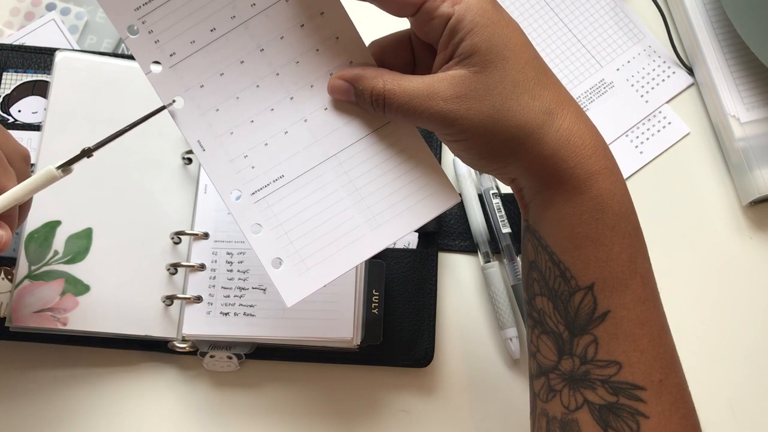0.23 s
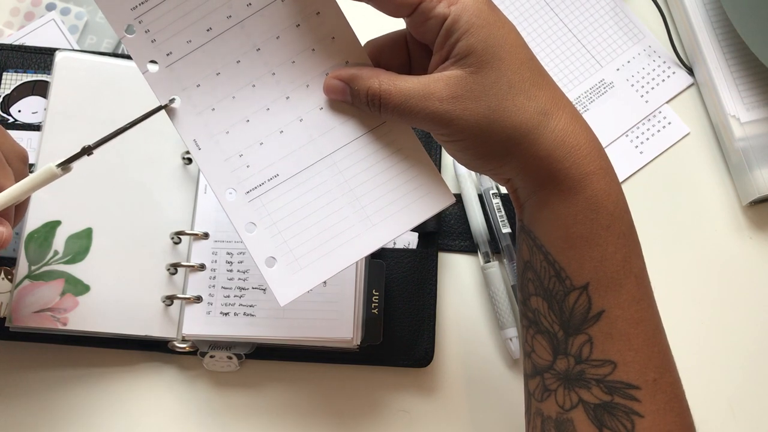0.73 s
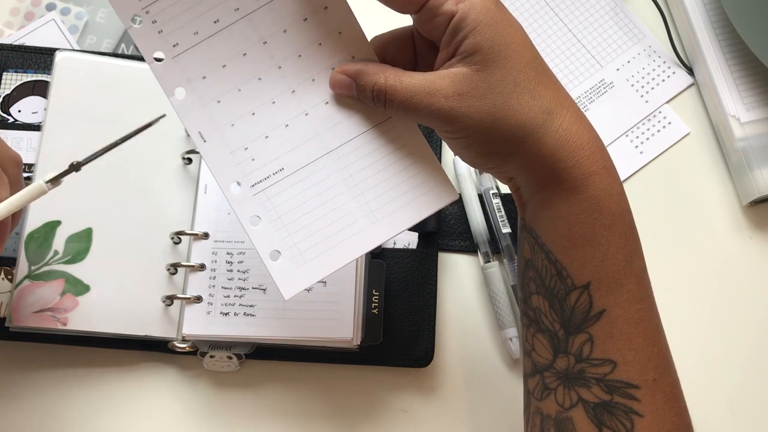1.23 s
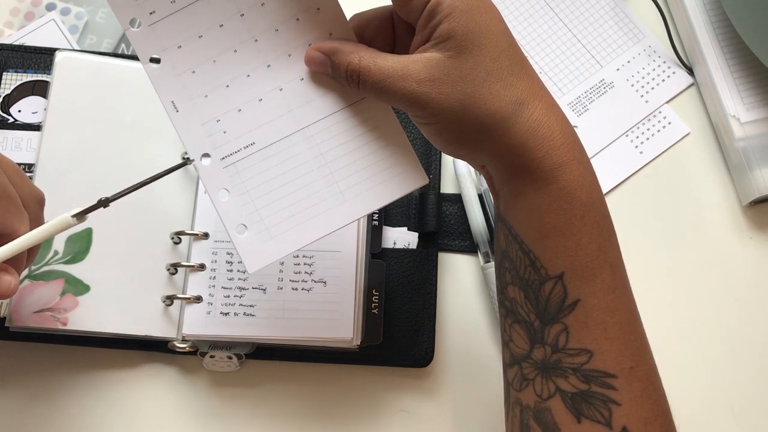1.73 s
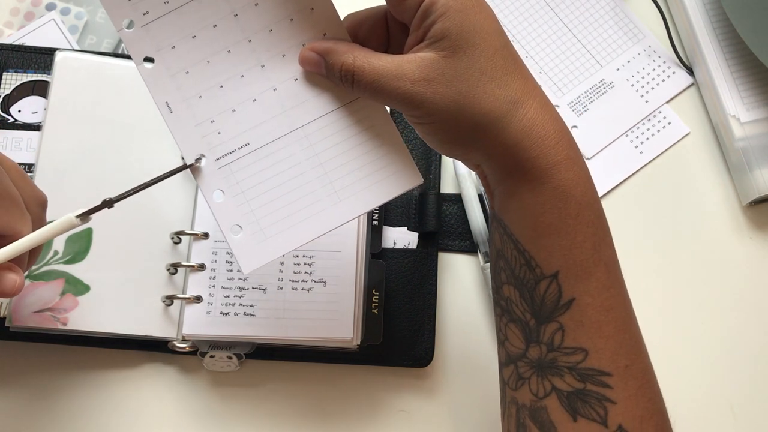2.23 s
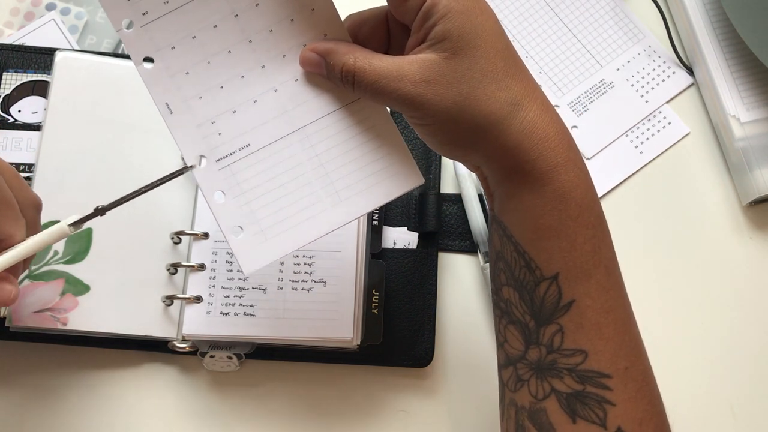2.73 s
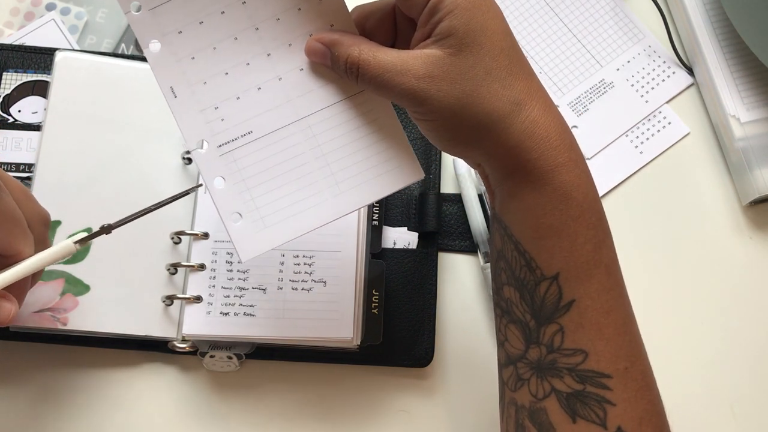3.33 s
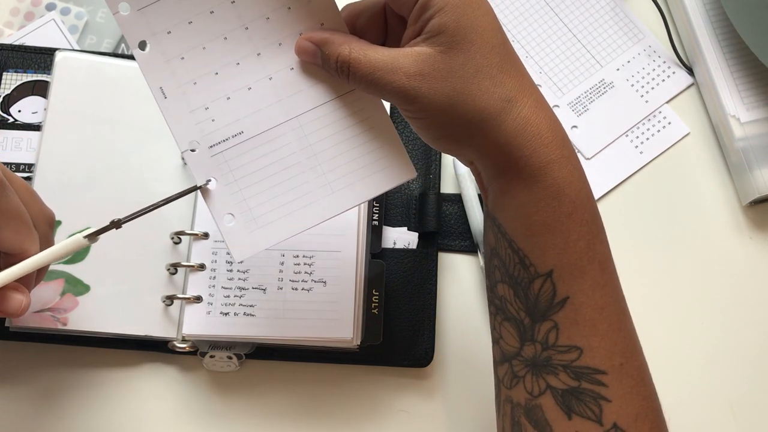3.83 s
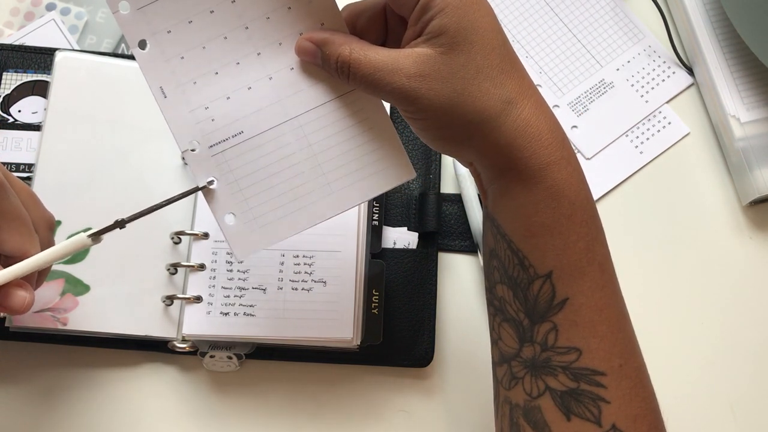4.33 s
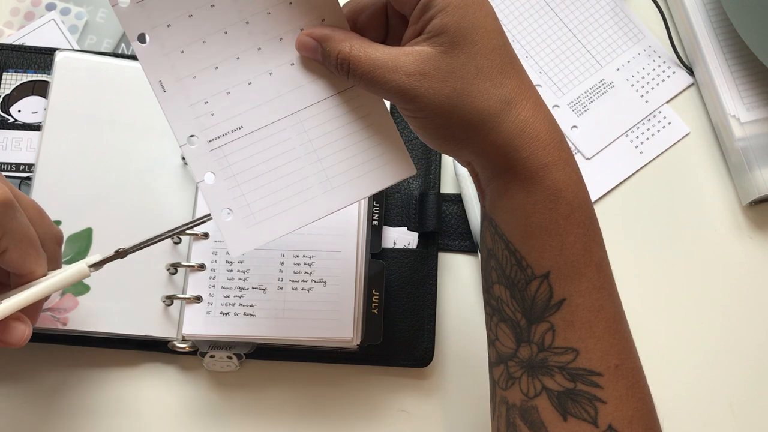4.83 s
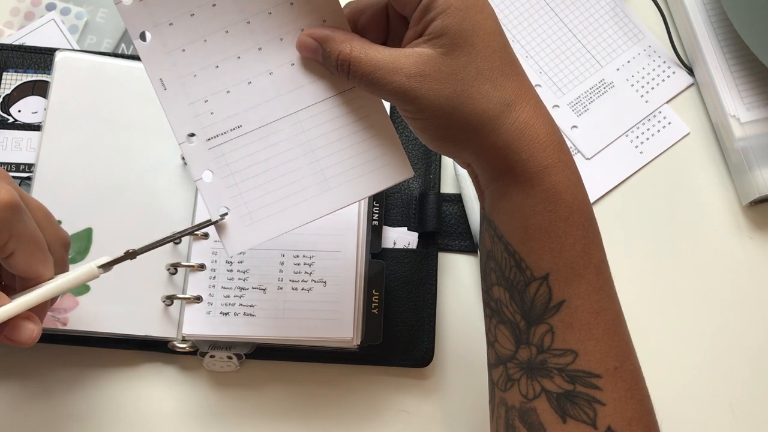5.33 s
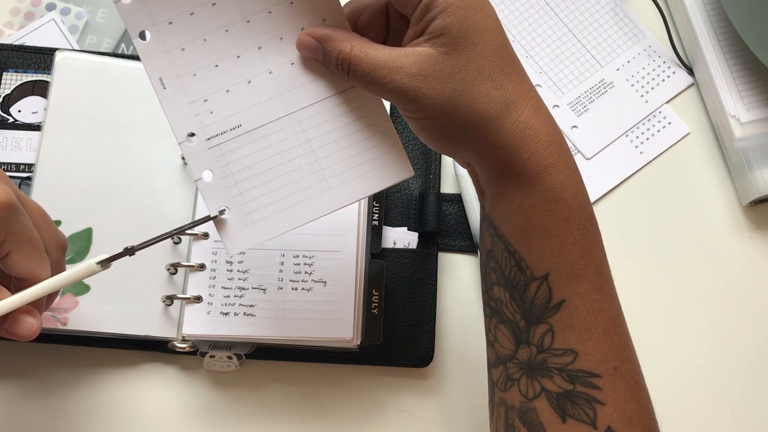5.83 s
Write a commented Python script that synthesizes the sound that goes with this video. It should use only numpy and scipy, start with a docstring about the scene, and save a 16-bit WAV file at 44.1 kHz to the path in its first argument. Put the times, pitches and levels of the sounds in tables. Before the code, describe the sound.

A close, quiet indoor scene with faint low hum, soft rumble and slight hiss. At 0.5 s a scissor tip barely brushes paper. At 1.04 s comes the first snip: a tiny bite, snapping fibres with a strong papery ring, and a hard bright steel clack with a short room tail. The blades scrape open from about 1.15 s and flick off the sheet at 1.26 s, the strongest flick. Soft brushes follow around 1.9-2.3 s. The second snip lands at 2.67 s, opening with a quieter rasp until 2.86 s. Two dry ticks sound near 3.15 s, then light rubs and little skips from 3.35 to 4.3 s. The third, slightly brighter snip hits at 4.47 s, its scrape ending at 4.63 s. A faint tap at 4.9 s, a brief scrape at 5.05 s, small brushes at 5.5-5.9 s and a last tick at 6.03 s finish it.

```python
"""Scissors snipping paper

Small scissors cut three slits into the punched edge of a paper sheet held over a desk.
Each snip: fibres snap, the blades clack shut (impact and modal ringing), then scrape open by
stick-slip friction and flick free of the sheet. Between snips the tips brush and tap the paper.
Shaped noise and decaying modes make every contact; a small room answers over low hum and hiss."""
import sys
import numpy as np
from scipy import signal
from scipy.fft import rfft, irfft, next_fast_len
from scipy.io import wavfile
from scipy.ndimage import map_coordinates

SR = 44100
rng = np.random.default_rng(int(sys.argv[2]) if len(sys.argv) > 2 else 0)


def dump_mix(stems):
    """Bounce the given channels to the path in sys.argv[1] as a 16-bit WAV at rate SR."""
    frames = np.atleast_2d(stems).T  # one column per channel
    limited = np.clip(frames, -1, 1)  # hard clip at full scale
    pcm = np.round(limited * 32767).astype(np.int16)
    wavfile.write(sys.argv[1], SR, pcm)


N = 268701  # length in samples
TOP_HZ = 15950  # upper band limit
SIZE = 8192  # samples in one short sound or filter
AGE = np.arange(SIZE) / SR  # seconds since a sound began
TIME = np.arange(N) / SR  # seconds since the scene began


def amp(db):
    """Level law: decibels to amplitude ratio."""
    return 10 ** (np.asarray(db) / 20)


def unit(x):
    """Power normalisation: scale to rms 1."""
    return x / np.sqrt(np.mean(x ** 2) + 1e-20)


def packet(x):
    """Energy normalisation: scale the sum of squares to 1."""
    return x / (np.linalg.norm(x) + 1e-20)


def along(points, hz):
    """Logarithmic frequency scale: interpolate (Hz, value) points on a log axis."""
    f, v = np.transpose(points)
    return np.interp(np.log(hz + 1), np.log(f + 1), v)


def fade(t, t60):
    """Exponential decay: amplitude falls 60 dB in t60 seconds."""
    return np.exp(-np.log(1000) * t / t60)


def wobble(rate):
    """Slow random modulation: a smooth curve through rate random knots a second."""
    knots = rng.standard_normal(int(N * rate / SR) + 4)
    return map_coordinates(knots, [TIME * rate])


def colour(x, spectrum):
    """Minimum-phase filtering: a folded cepstrum gives a causal filter with this spectrum."""
    gain = amp(along(spectrum, np.fft.rfftfreq(SIZE, 1 / SR)))
    cepstrum = irfft(np.log(gain))
    cepstrum[1:SIZE // 2] *= 2
    cepstrum[SIZE // 2 + 1:] = 0
    response = irfft(np.exp(rfft(cepstrum)))
    return signal.fftconvolve(x, response)[:len(x)]


def tilted(spectrum, tilt):
    """Spectral tilt: tip a spectrum above 1 kHz by so many dB per octave."""
    return [(hz, level + tilt * np.log2(max(hz, 1000) / 1000)) for hz, level in spectrum]


def add(track, s, sound):
    """Superposition: sum a sound into the track at time s."""
    part = track[round(s * SR):][:len(sound)]
    part += sound[:len(part)]


def ring(hz, t60):
    """Modal vibration: one damped sine of energy 1."""
    return packet(np.sin(2 * np.pi * hz * AGE) * fade(AGE, t60))


def impact(spectrum, t60, chatter_db):
    """Impulsive excitation: a sharp blow and dying micro-contacts, coloured to energy 1."""
    force = amp(chatter_db) * packet(rng.standard_normal(SIZE) * fade(AGE, t60))
    force[0] += 1
    return packet(colour(force, spectrum))


def slips(count, rate):
    """Stick-slip friction: a dense run of tiny slips at random moments, of random size."""
    happens = rng.random(count) < rate / SR
    spread_db = 1.5 * rng.standard_normal(count)
    return happens * rng.standard_normal(count) * amp(spread_db)


# Resonances of the rubbed blades: freq_hz, width_hz, level_db
BLADE_RESONANCES = [(1452.1, 250, -1.5), (2377.1, 230, 9), (3221.7, 620, -6.5), (4375.6, 280, 0),
                    (5771.6, 500, -1.5), (6694.4, 160, -8.5)]


def blades(x, ring_db):
    """Resonant response: rubbing makes the steel ring at its own frequencies."""
    modes = np.zeros(len(x))
    for hz, width, db in BLADE_RESONANCES:
        modes += amp(db) * signal.lfilter(*signal.iirpeak(hz, hz / width, SR), x)
    return x + amp(ring_db) * modes


def stroke(length, rise, sag_db, release_s, spectrum, ring_db, rate):
    """Sustained friction: a rub gathers speed for share rise, sags, then dies away."""
    t = np.arange(2 * SIZE) / SR
    rub = unit(blades(colour(slips(len(t), rate), spectrum), ring_db))
    share = t / length
    speed_up = np.minimum(share / rise, 1)
    sag = amp(-sag_db * np.clip((share - rise) / (1 - rise), 0, 1))
    release = np.exp(-np.maximum(t - length, 0) / release_s)
    return rub * speed_up * sag * release


# Hum partials, rms before waver and drift: freq_hz, level_db
HUM_PARTIALS = [(59.2, -64), (119, -75.5), (177.8, -84)]
# Slow drift shared by hum and rumble: time_s, gain_db
DRONE_DRIFT = [(0, -0.5), (.8, 0), (2.7, -1), (3.3, -1.5), (6.1, -4.5)]
# Relative spectrum of the steady hiss: freq_hz, density_db (per Hz)
AIR_SPECTRUM = [(25, -27), (60, -1.5), (120, -3), (220, -1.5), (350, -4.5), (520, -11), (1000, -13.5),
                (1600, -17), (3200, -22.5), (6300, -26), (9000, -28), (10500, -30.5), (12500, -27),
                (15800, -29.5)]


def background():
    """Stationary noise and tones: a wavering hum and rumble under faint steady hiss."""
    hum = np.zeros(N)
    for hz, db in HUM_PARTIALS:
        phase = 2 * np.pi * hz * TIME + 0.35 * wobble(7.6)
        hum += amp(db + 1.4 * wobble(12)) * np.sqrt(2) * np.sin(phase)
    rumble_spectrum = [(20, -41), (30, -24), (45, -3.0), (62, -3.5), (90, -10.0), (220, -15.5),
                       (500, -27.5), (1500, -58.5)]
    rumble = unit(colour(rng.standard_normal(N), rumble_spectrum))
    air = unit(colour(rng.standard_normal(N), AIR_SPECTRUM))
    drift = amp(np.interp(TIME, *np.transpose(DRONE_DRIFT)))
    return drift * (hum + amp(-70) * rumble) + amp(-69.5) * air


# Tips brushing the sheet: start_s, length_s, level_db, tilt_db_per_octave,
# skips (rounded to a whole number; none if not positive)
BRUSH_STROKES = [(.485, 0.03884, -67, -5.5, 0.5), (1.927, 0.05472, -71.5, -.5, 0.5),
                 (2.159, 0.02213, -67.5, -1, -0.5), (2.222, 0.01293, -63.5, -2.5, 1.5),
                 (3.351, 0.1595, -73, -4, -1), (3.584, .06, -65, 1.5, 0.5),
                 (3.691, 0.027468, -61, 1.5, 0.5), (3.994, 0.04354, -62, -1.5, 3.5),
                 (5.465, .07, -65.5, 1.5, -0.5), (5.713, .026, -61, .5, -0.5), (5.8, .03, -71.5, 3, 0.5)]
# Relative spectrum of tip on paper: freq_hz, density_db (per Hz)
BRUSH_SPECTRUM = [(100, 1.5), (700, -4), (1300, 1.5), (2400, 0.5), (4500, -1.5), (5100, -9), (7000, -7),
                  (9000, -20), (15500, -19.5)]


def rustle():
    """Crackling noise: the sheet stirs faintly before and after a tip pushes it."""
    spread_s = .08
    stir = np.zeros(N)
    for s, length, db, *_ in BRUSH_STROKES:
        stir += amp(db) * np.exp(-((TIME - s - length / 2) / spread_s) ** 2 / 2)
    crackle = colour(slips(N, rate=3200), BRUSH_SPECTRUM)
    uneven = amp(3.5 * wobble(70))
    return amp(-16.5) * stir * unit(crackle * uneven)


SKIP_GAP_S, SKIP_LENGTH_S = .073, 0.016
SKIP_DB, SKIP_LOSS_DB = -5, 1.5  # first hop against the brush, further loss with each later hop


def brushes():
    """Sliding friction: a tip drags over the paper and may skip on in ever fainter hops."""
    out = np.zeros(N)
    for s, length, db, tilt, skips in BRUSH_STROKES:
        rubs = [(s, length, db)]
        for k in range(round(skips)):
            rubs.append((s + SKIP_GAP_S * (k + 1), SKIP_LENGTH_S, db + SKIP_DB - SKIP_LOSS_DB * k))
        for start, span, level in rubs:
            rub = stroke(span, rise=0.29486, sag_db=3, release_s=0.0072,
                         spectrum=tilted(BRUSH_SPECTRUM, tilt), ring_db=-3, rate=9300)
            add(out, start, amp(level) * rub)
    return out * amp(2.0 * wobble(150))


# Reverberation time of the room: freq_hz, t60_s
ROOM_DECAY = [(150, .3), (1000, 0.22), (2600, 0.25413), (7000, 0.24256), (15000, 0.14)]


def room(x):
    """Diffuse reverberation: a decaying noise tail, longest in the bass.

    Each second of sound gets a fresh random tail, so no one tail's colour repeats."""
    out = np.zeros(N)
    for start in range(0, N, SR):
        hz, t, z = signal.stft(rng.standard_normal(SR // 2), SR, nperseg=256)
        decay = fade(t, along(ROOM_DECAY, hz)[:, None])
        tail = signal.istft(z * decay, SR, nperseg=256)[1]
        onset = 1 - np.exp(-np.arange(len(tail)) / SR / 0.0023)
        tail = packet(tail * onset)
        add(out, start / SR, signal.fftconvolve(x[start:start + SR], tail))
    return colour(out, [(200, 4.5), (600, 6.5), (1500, -0.5), (2400, -1.0), (4500, -0.5),
                        (7000, -1), (15000, 0.5)])


def all_round(source, count):
    """Directional radiation: a different burst to each wall, the answers blending smoothly."""
    return sum(room(source()) for _ in range(count)) / np.sqrt(count)


# Relative spectrum of breaking fibres: freq_hz, density_db (per Hz)
CRACK_SPECTRUM = [(60, -24), (250, -8), (700, -11), (1200, -8.5), (2400, -1.5), (3600, -4), (5200, -11),
                  (6500, -5.5), (9000, -13.5), (15500, -15)]
# Modes of the taut paper: ratio (multiple of the ring pitch), level_db, t60_s
SHEET_MODES = [(.58, -8, 0.00757), (.72, -7.5, 0.00806), (.89, -2.5, .007), (1.03, 0.5, 0.009554)]


def snap(crack_db, ring_db, hz):
    """Sudden release of tension: fibres crack and the taut paper rings for a few cycles."""
    sheet = np.zeros(SIZE)
    for k, (ratio, db, t60) in enumerate(SHEET_MODES):
        sheet += (-1) ** k * amp(db) * ring(hz * ratio, t60)
    crack = impact(CRACK_SPECTRUM, t60=0.02, chatter_db=13.5)
    return amp(crack_db) * crack + amp(ring_db) * packet(sheet)


# The blades bite into the edge: start_s, level_db
EDGE_BITES = [(1.029, -17), (2.6392, -25), (4.4345, -30.5)]
# One closing of the scissors: shut_s, clack_db, clack_tilt_db_per_octave, break_db,
# paper_ring_db, ring_hz
CLOSINGS = [(1.0444, -4.5, 0, -12.5, 0.5, 2620), (2.6742, -5, 0.1937, -14, -10.5, 4386),
            (4.468, -4, 0.5632, -19, -15, 2435)]
BITE_GAP_S, BITE_HZ, BITE_RISE = 0.0046, 3375.1, 1.95  # each break rings higher by the factor
TEAR_LEAD_S, BREAK_LEAD_S = 0.0088, .0043  # before the blades shut


def snaps(paper_db, count=2):
    """Fracture in stages: the blades bite, the last strip tears, then breaks.

    paper_db raises or lowers the ring of that final break."""
    out = np.zeros(N)
    for s, db in EDGE_BITES:
        for k in range(count):
            bite = snap(crack_db=-2.5, ring_db=-5, hz=BITE_HZ * BITE_RISE ** k)
            add(out, s + k * BITE_GAP_S, amp(db) * bite)
    for s, _, _, break_db, ring_db, hz in CLOSINGS:
        add(out, s - TEAR_LEAD_S, snap(crack_db=-25, ring_db=-28.5, hz=3095.3))
        add(out, s - BREAK_LEAD_S, snap(break_db, ring_db + paper_db, hz))
    return out


# Relative spectrum of the closing blow, before its tilt: freq_hz, density_db (per Hz)
CLACK_SPECTRUM = [(60, -21), (250, -14.5), (900, -7), (1500, 0.5), (2400, 2.5), (3300, -4), (4500, -3),
                  (7000, 1.5), (9800, -1.5), (11000, -4.5), (15500, -12.5)]
# Modes of the scissors: freq_hz, level_db (mean), t60_s
STEEL_MODES = [(1161.3, -20.5, 0.098118), (1445, -14.5, 0.059), (2347, -7.5, 0.03839), (2642.9, -15, 0.053),
               (4315, -14, 0.05697), (6184.7, -13.5, 0.032), (6949.5, -13, 0.048), (8479.6, -14, 0.037),
               (9978.9, -14.5, 0.02897)]


def clacks():
    """Impact and modal ringing: the blades slam shut; the hand soon damps the steel."""
    out = np.zeros(N)
    for s, db, tilt, *_ in CLOSINGS:
        steel = np.zeros(SIZE)
        for hz, level, t60 in STEEL_MODES:
            steel += amp(level + rng.normal(0, 1.5)) * ring(hz, t60)
        blow = impact(tilted(CLACK_SPECTRUM, tilt), t60=0.018, chatter_db=5.0)
        add(out, s, amp(db) * (blow + amp(-8) * steel))
    return out


# Blades scraping along each other as they open: end_s, length_s, level_db, tilt_db_per_octave
SCRAPE_STROKES = [(1.261, .108, -48, -2.0135), (2.863, .12, -53.5, -0.8659), (4.63, .115, -52, 0.5),
                  (5.067, 0.028, -54.5, 1)]
# Relative spectrum of blade on blade, before its tilt: freq_hz, density_db (per Hz)
SCRAPE_SPECTRUM = [(100, -10.5), (700, -5), (1300, -2.5), (2400, -2.5), (4500, -1), (5200, -10.5),
                   (7000, -5.5), (9500, -12), (15500, -13.5)]


def scrapes():
    """Stick-slip friction: blade slides on blade under an uneven grip."""
    out = np.zeros(N)
    for end, length, db, tilt in SCRAPE_STROKES:
        ring_db = -3 - 4 * tilt  # a dull stroke rings the blades more than a bright one
        rub = stroke(length, rise=.39, sag_db=7, release_s=.005,
                     spectrum=tilted(SCRAPE_SPECTRUM, tilt), ring_db=ring_db, rate=7000)
        add(out, end - length, amp(db) * rub)
    return out * amp(1.1 * wobble(150))


# Opening blades flicking off the sheet: time_s, scuff_db, resonance_db, flap_db, flap_hz
FLICK_EVENTS = [(1.2637, -14.5, 7.5, -23.5, 969.8), (2.863, -20.5, -17.5, -23, 1410),
                (4.6309, -22, 2, -27, 1446)]
# Relative spectrum of the scuff: freq_hz, density_db (per Hz)
SCUFF_SPECTRUM = [(80, -19), (300, -2.5), (900, -3), (1700, 6), (2400, -3.5), (3500, 1.5), (5500, -8.5),
                  (9000, -12), (15500, -18)]


def flicks():
    """Friction then free recoil: the sheet scuffs over the blade tips, then flaps back."""
    out = np.zeros(N)
    for s, scuff_db, ring_db, flap_db, hz in FLICK_EVENTS:
        drag = (AGE / .003) ** 2 * fade(AGE, .017) * rng.standard_normal(SIZE)
        scuff = packet(blades(colour(drag, SCUFF_SPECTRUM), ring_db))
        flap_spectrum = [(100, -13), (hz * .5, -8), (hz, 0), (hz * 1.169, -12), (hz * 4, -35)]
        flap = impact(flap_spectrum, t60=0.042, chatter_db=7)
        add(out, s - .0015, amp(scuff_db) * scuff)
        add(out, s + 0.0057, amp(flap_db) * flap)
    return out


# Blade tips tapping the paper's edge: start_s, tick_db, centre_hz, bandwidth_octaves, tink_db
TAP_EVENTS = [(3.1454, -25.5, 2130, 2, -42.5), (3.1817, -31.5, 2660, 0.3875, -61.5),
              (4.903, -32.5, 2144, 5.4, -49), (6.035, -30.5, 2119, 0.67, -39)]
# Relative spectrum of the loose sheet's tick, before its band: freq_hz, density_db (per Hz)
TICK_SPECTRUM = [(80, -8), (500, -2.5), (1050, 6.5), (1700, -5), (2400, 5), (3400, -1.5), (5000, -4),
                 (6400, -29), (8000, -32.5), (15500, -11)]


def taps():
    """Light impact: the loose sheet gives a dry tick, the steel tip a faint tink."""
    out = np.zeros(N)
    grid = np.geomspace(50, TOP_HZ, num=40)
    for s, db, hz, octaves, tink_db in TAP_EVENTS:
        # strongest around the centre
        band = -10 * np.log10(1 + (2 * np.log2(grid / hz) / octaves) ** 2)
        tick_spectrum = np.c_[grid, along(TICK_SPECTRUM, grid) + band]
        tick = impact(tick_spectrum, t60=0.01397, chatter_db=9.5)
        tink = packet(ring(6431, 0.02268) + ring(6981, 0.00962))
        add(out, s, amp(db) * tick + amp(tink_db) * tink)
    return out


def scene():
    """Direct and reverberant sound: scissors and paper close by, the room behind them."""
    handling = rustle() + brushes() + scrapes() + flicks() + taps()
    cuts = snaps(paper_db=0) + clacks()
    # the sheet beams its snap at the microphone, the steel radiates all round
    cut_tail = all_round(lambda: amp(-11.5) * snaps(paper_db=-3.5) + amp(-12.5) * clacks(), count=4)
    handling_tail = amp(-12.5) * room(handling)
    return (background() + handling + handling_tail + cuts + cut_tail)[None]


def record(dry):
    """Band limitation: the recorder keeps nothing above its upper limit."""
    size = next_fast_len(N + SIZE)
    passed = np.fft.rfftfreq(size, 1 / SR) < TOP_HZ
    return irfft(rfft(dry, size) * passed, size)[:, :N]


dry = scene()
out = record(dry)
dump_mix(out)
```